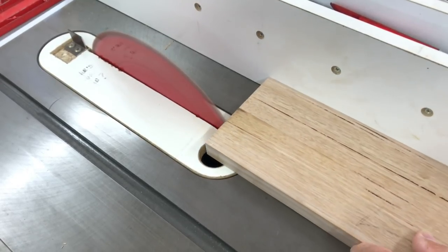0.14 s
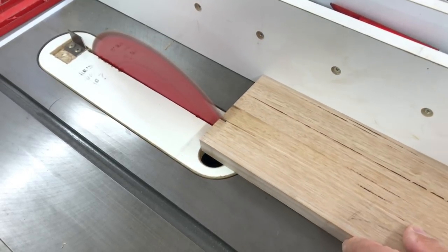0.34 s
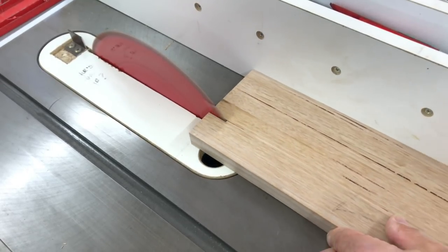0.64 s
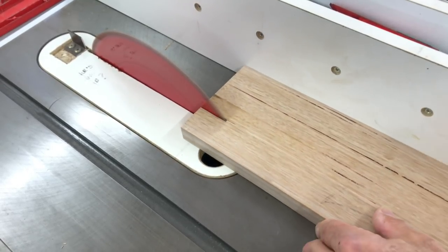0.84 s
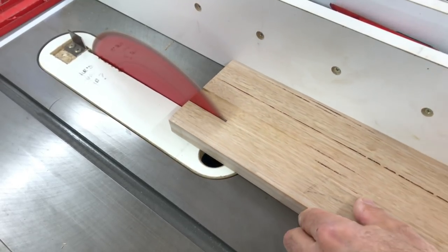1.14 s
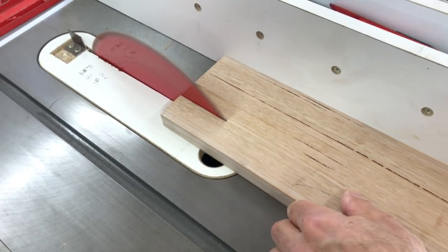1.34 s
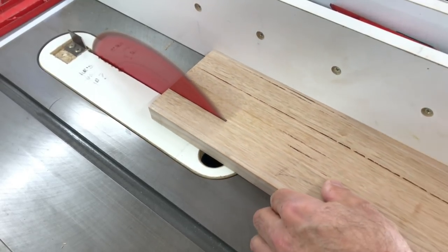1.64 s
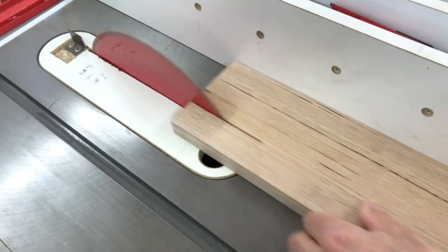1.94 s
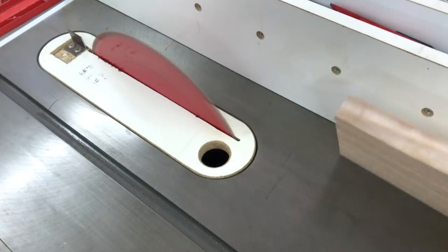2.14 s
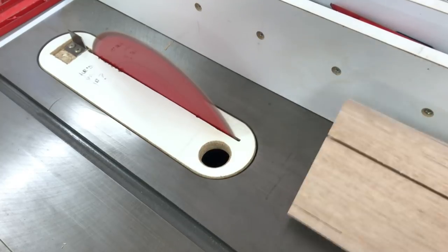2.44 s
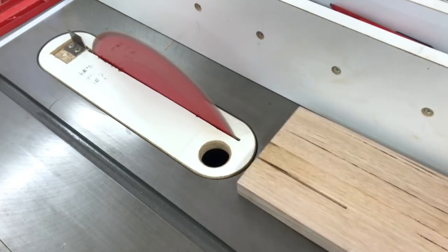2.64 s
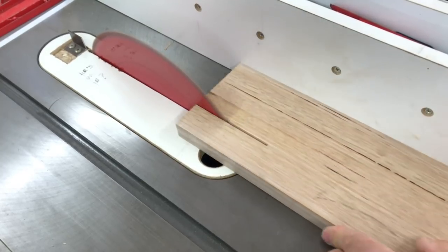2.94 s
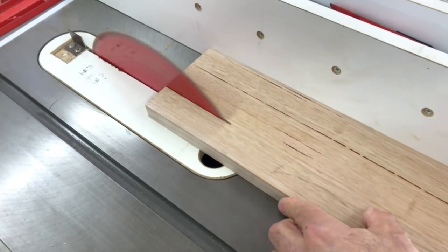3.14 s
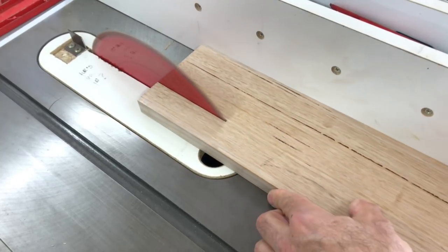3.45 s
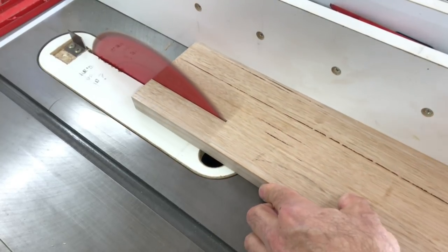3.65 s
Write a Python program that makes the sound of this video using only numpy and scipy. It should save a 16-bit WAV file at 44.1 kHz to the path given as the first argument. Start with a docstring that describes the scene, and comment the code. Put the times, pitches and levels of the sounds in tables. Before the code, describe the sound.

A table saw cuts a hardwood board from the start, its high motor whine sagging slightly and throbbing over blade ringing and airy hiss. At about 2 seconds the cutting stops, the whine lifts a little and the machine's hum and rumble grow louder. The board ticks lightly twice around 2.7 seconds. From about 3 seconds the blade cuts again, continuing until the end near 3.8 seconds.

```python
"""Table saw cutting hardwood

A board is fed into a workshop saw, drawn back and fed in again. The motor whine sags and throbs
under load, and in the cut the teeth excite the blade's resonances. With the board off the throat
opening, the cabinet's rumble and the drone of armature, shaft and hum come through louder.
The blade whips the air into a hiss, and the board's edge ticks twice on the table."""
import sys
import numpy as np
from scipy import signal
from scipy.fft import rfft, irfft
from scipy.io import wavfile
from scipy.ndimage import uniform_filter1d

SR = 44100
rng = np.random.default_rng(int(sys.argv[2]) if len(sys.argv) > 2 else 0)


def wav_out(sig):
    """Save sig, one row per channel (or a flat mono array), as 16-bit PCM at SR to the path in sys.argv[1]."""
    wavfile.write(sys.argv[1], SR, np.round(np.clip(np.atleast_2d(sig).T, -1, 1) * 32767).astype(np.int16))


N = 167580
SLOTS = 12  # armature slots, one whine cycle each
# Cabinet sound escaping through the throat opening: time_s, relative_db
THROAT_LEVEL = [(0.0, -46), (0.02, -44), (0.24, -49), (1.69, -48.5), (2.2, -41), (2.81, -40.5),
                (2.87, -40.5), (2.89, -44), (2.92, -41.5), (3.22, -44), (3.25, -42), (3.52, -46.5),
                (3.64, -45.5), (3.77, -46.5), (3.78, -40), (3.8, -52)]


def from_db(db):
    """Amplitude ratio of a level: tenfold for every 20 dB."""
    return 10 ** (np.asarray(db) / 20)


def rms_one(x):
    """Normalisation to unit power."""
    return x / np.sqrt(np.mean(x ** 2) + 1e-20)


def in_time(rows):
    """Linear interpolation of breakpoints: one curve for each column after time_s."""
    time_s, *columns = np.transpose(rows)
    return [np.interp(np.arange(N) / SR, time_s, column) for column in columns]


def drift(rate_hz):
    """Low-pass filtered noise: a slow random fluctuation of unit spread."""
    step = 40
    pole = np.exp(-2 * np.pi * rate_hz * step / SR)
    white = rng.standard_normal(N // step + 2002)
    slow = signal.lfilter([1], [1, -2 * pole, pole * pole], white)[2000:]
    return np.interp(np.arange(N) / step, np.arange(len(slow)), rms_one(slow - slow.mean()))


def coloured(spectrum, flicker_db, rate_hz, bands):
    """Spectral shaping: noise of unit rms in overlapping bands that flicker independently."""
    log_hz = np.log(np.maximum(np.arange(N // 2 + 1) * SR / N, 1.))
    knot_hz, knot_db = np.transpose(spectrum)
    knots = np.log(knot_hz)
    shaped = rfft(rng.standard_normal(N)) * from_db(np.interp(log_hz, knots, knot_db, -70, -70))
    centres = np.linspace(knots[0], knots[-1], bands)
    layers = (irfft(shaped * np.interp(log_hz, centres, hat), N) for hat in np.eye(bands))
    return rms_one(sum(layer * from_db(flicker_db * drift(rate_hz)) for layer in layers))


def tone(cycles, rms_db, waver_db):
    """A sinusoid under slow random amplitude modulation."""
    return np.sqrt(2) * from_db(rms_db + waver_db * drift(5.2)) * np.sin(2 * np.pi * cycles)


def rotation():
    """Load slows the motor. Speed integrates to phase, in cycles; load runs from 0 to 1."""
    # Slot-passing frequency: time_s, pitch_hz
    slot_rate = [(0, 3154), (.1, 3140), (.2, 3130), (.5, 3116), (.8, 3105), (1.2, 3094), (1.6, 3096),
                 (1.84, 3104), (1.96, 3184), (2.3, 3186), (3.26, 3186), (3.4, 3131), (3.5, 3119),
                 (3.6, 3115), (3.8, 3114)]
    slot_idle_hz, shaft_idle_hz, whistle_idle_hz = 3186, 41.12, 4373
    slot_hz, = in_time(slot_rate)
    sag = 1 - slot_hz / slot_idle_hz
    jitter = 1 + .00015 * drift(25)
    armature = np.cumsum(slot_hz * jitter) / SR / SLOTS + .3
    shaft = np.cumsum(shaft_idle_hz * (1 - .91 * sag)) / SR
    whistle_cycles = np.cumsum(whistle_idle_hz * (1 - .66 * sag)) / SR
    return armature, shaft, whistle_cycles, sag / sag.max()


def reflections(x):
    """Comb filtering: echoes off table, fence and walls ripple the spectrum."""
    # Near reflections: delay_ms, relative_gain
    paths = [(2.3, -.1), (4.1, .12), (7.7, -.12), (13.1, .12)]
    taps = np.zeros(SR // 50)
    taps[0] = 1
    for delay_ms, gain in paths:
        taps[int(delay_ms * SR / 1000)] = gain
    return signal.fftconvolve(x, taps / np.linalg.norm(taps))[:N]


def machine_drone(armature, shaft):
    """Hum, rotation harmonics and their sum tones; most grow louder as the throat opens."""
    # Drone partials: hum_hz, armature_multiple, shaft_multiple, covered_db, open_db
    partials = [(198.25, 0, 0, -64.5, -57), (400.25, 0, 0, -60, -42), (0, 1, 0, -51.5, -46),
                (0, 0, 4, -74, -68), (0, 0, 6, -56.5, -52), (0, 0, 7, -60, -58), (0, 0, 8, -61, -60),
                (0, 0, 10, -74, -55), (0, 0, 11, -67, -55), (0, 0, 12, -66, -59), (0, 0, 14, -64, -63),
                (0, 0, 20, -64, -67), (0, 1, 8, -65, -62), (0, 1, 16, -66, -68), (0, 1, 2, -66, -61),
                (0, 1, 4, -65, -55), (0, 1, 6, -65, -66), (0, 2, 0, -68, -61), (400.25, 0, 1, -67, -59),
                (400.25, 0, 2, -70, -58), (400.25, 0, 4, -68, -55), (400.25, 0, 6, -70, -57),
                (400.25, 0, 10, -70, -60)]
    throat_db, = in_time(THROAT_LEVEL)
    opened = np.interp(uniform_filter1d(throat_db, size=6000), [-48, -42], [0, 1])
    t = np.arange(N) / SR
    drone = 0
    for hum_hz, armature_multiple, shaft_multiple, covered_db, open_db in partials:
        cycles = hum_hz * t + armature_multiple * armature + shaft_multiple * shaft
        offset = rng.random() * (covered_db < -57)  # the two beating partials stay locked to the throb
        drone += tone(cycles + offset, covered_db + (open_db - covered_db) * opened, waver_db=.6)
    return drone


def cabinet_rumble():
    """Radiation through an aperture: cabinet noise is louder with the throat uncovered."""
    # Rumble spectrum: frequency_hz, relative_db
    spectrum = [(100, -44), (145, -36), (190, -26), (225, -25), (260, -15), (300, -23), (340, -7.5),
                (385, -10.5), (430, -8.5), (470, -15), (600, -9.5), (760, -14), (840, -12), (900, -7),
                (1330, -12), (1430, -16.5), (2100, -17.5), (2600, -35)]
    throat_db, = in_time(THROAT_LEVEL)
    return from_db(throat_db - 2) * coloured(spectrum, flicker_db=1.75, rate_hz=60, bands=9)


def air_hiss():
    """Turbulence: air and dust whipped by the blade make broadband noise."""
    # Hiss envelope: time_s, relative_db
    envelope = [(0.0, -40.5), (0.02, -49), (0.05, -44.5), (0.07, -45), (0.26, -47.5), (1.46, -47),
                (1.5, -48.5), (1.97, -46), (2.02, -44), (2.05, -46), (2.07, -45), (2.98, -44),
                (3.58, -46.5), (3.8, -46)]
    # Hiss spectrum: frequency_hz, relative_db
    spectrum = [(900, -56), (1300, -10), (1900, -18.5), (2400, -5.5), (3000, -9.5), (3500, -12.5),
                (4400, -9), (5200, -13), (6000, -13.5), (6700, -11), (8300, -12), (9500, -6), (11300, -5.5),
                (14000, -6), (15800, -4)]
    hiss_db, = in_time(envelope)
    return from_db(hiss_db + 6.5) * coloured(spectrum, flicker_db=.93, rate_hz=10, bands=22)


def board_ticks():
    """Damped impacts: the board's edge on the table gives fast-decaying bursts of band noise."""
    # Edge contacts: start_s, relative_db, low_hz, high_hz
    contacts = [(2.6365, -21, 4300, 6300), (2.746, -25, 900, 2600)]
    t60_s = .014
    ticks, t = np.zeros(N), np.arange(N) / SR
    for start_s, db, low_hz, high_hz in contacts:
        decay = (t > start_s) * from_db(db - 60 * np.maximum(t - start_s, 0) / t60_s)
        band = signal.butter(2, [low_hz, high_hz], "band", fs=SR, output="sos")
        ticks += 2 * signal.sosfilt(band, decay * rng.choice([-1, 1], N))
    return ticks


def whistle(cycles):
    """An inharmonic partial: a thin tone outside the whine's harmonic series."""
    # Whistle envelope: time_s, level_db
    envelope = [(0, -54), (1, -57.5), (1.8, -50.5), (2, -52), (2.7, -48.5), (3.3, -50.5), (3.8, -61)]
    level_db, = in_time(envelope)
    return tone(cycles, level_db, waver_db=1.25)


def motor_whine(armature, throb):
    """Periodic excitation: passing armature slots give five harmonics, modulated by the throb."""
    # Whine harmonics: time_s, then level_db of harmonics 1 to 5
    harmonics = [(0, -48, -43.5, -48, -46, -57), (.14, -42.5, -43.5, -48, -50, -51),
                 (.37, -44.5, -48.5, -53, -44, -56), (.6, -43.5, -46.5, -55, -45, -61),
                 (.86, -43.5, -44, -66, -52, -51), (1.1, -41, -40, -58, -46, -46),
                 (1.3, -41, -42, -60, -52, -46), (1.55, -42, -42.5, -69, -63, -48),
                 (1.86, -42, -45, -57, -57, -53), (1.96, -43.5, -50.5, -49, -58, -70),
                 (2.08, -43.5, -43.5, -60, -56, -70), (2.3, -41.5, -43, -55, -46, -70),
                 (2.7, -42.5, -42.5, -65, -48, -70), (2.83, -41.5, -44.5, -53, -41, -70),
                 (2.88, -41, -44.5, -40, -50, -70), (3.1, -43, -50, -47, -56, -70),
                 (3.3, -42, -45.5, -50, -66, -58), (3.44, -41.5, -43, -65, -62, -56),
                 (3.8, -43, -43, -58, -60, -57)]
    # Modulation of the second harmonic: time_s, throb_factor
    octave_throb = [(0, 1.1), (1.9, 1.1), (3.3, 3.6), (3.8, 3.8)]
    octave_factor, = in_time(octave_throb)
    whine = 0
    for k, level_db in enumerate(in_time(harmonics), 1):
        partial = tone(k * SLOTS * armature + rng.random(), level_db, waver_db=.06 if k < 3 else 2.5)
        whine += partial * (1 + (octave_factor if k == 2 else .73) * throb)
    return whine


def blade_singing():
    """Resonance: one blade mode sings in the cut as a nearly pure tone."""
    # Singing mode: time_s, pitch_hz, level_db
    mode = [(0, 3630, -60), (.07, 3633, -49), (.2, 3624, -55), (.4, 3619, -54), (1.2, 3616, -56),
            (1.85, 3620, -52), (2.0, 3632, -66), (2.1, 3632, -75), (2.85, 3632, -75), (3.0, 3632, -59),
            (3.4, 3632, -56), (3.8, 3634, -55)]
    pitch_hz, level_db = in_time(mode)
    return tone(np.cumsum(pitch_hz + 4 * drift(15)) / SR, level_db, waver_db=2.2)


def blade_cutting(armature, load):
    """Forced vibration: chips torn at random ring the blade's modes, over a comb of armature tones."""
    # Strength of the cut: time_s, relative_db
    envelope = [(0.0, -48), (0.07, -47.5), (0.16, -48.5), (1.69, -46), (1.7, -47), (1.82, -45), (2.07, -61),
                (2.84, -72), (2.96, -50.5), (3.31, -47), (3.34, -44.5), (3.57, -44.5), (3.59, -43.5),
                (3.8, -46.5)]
    # Blade modes: centre_hz
    mode_hz = [1150, 2080, 2435, 2778, 3100, 3625, 3825, 4405, 5170, 5930, 6210, 6835, 7470, 7900, 8500,
               9020, 9300, 9600, 10580, 11850, 12790, 13200, 13700, 15200]
    # Resonance peak of each mode: bandwidth_hz, relative_db
    mode_peaks = [(415, -22), (198, -13.5), (70, -12.5), (35, -12), (41.7, -6), (30, -7), (50, -7),
                  (25.2, -5.5), (30, -14), (50, -15), (60, -7.5), (40, -6.5), (45.3, -7.5), (60, -14.5),
                  (21.8, -4), (45, -3.5), (80.5, -20.5), (60, -9.5), (90, -21.5), (40.2, -6.5), (50, -14),
                  (60, -19), (45, -22), (40, -15)]
    # Comb tones: armature_multiple
    comb_orders = [10, 13, 14, 15, 17, 20, 23, 24.62, 25, 29, 31, 32, 33, 34, 35, 36, 46]
    # Strength of each comb tone: relative_db
    comb_levels = [-18, -6, -5.5, -8.5, -2.5, -14, -18, -6, -2, -6, -12, -9, -11, -17, -7, -18, -22]
    ringing = comb = 0
    for centre_hz, (bandwidth_hz, db) in zip(mode_hz, mode_peaks):
        radius = np.exp(-np.pi * bandwidth_hz / SR)
        b = (1 - radius ** 2) / 2 * np.array([1, 0, -1])
        a = [1, -2 * radius * np.cos(2 * np.pi * centre_hz / SR), radius ** 2]
        gain = from_db(db + 1.3 * drift(2.9))
        ringing += gain * signal.lfilter(b, a, rng.standard_normal(N + 8000))[8000:]
    load_db = 6 * load - 10.5  # the comb grows with the load
    for order, db in zip(comb_orders, comb_levels):
        comb += tone(order * armature + rng.random(), db + load_db, waver_db=.68)
    cut_db, = in_time(envelope)
    return from_db(cut_db) * (from_db(4.5) * rms_one(ringing) + comb)


def scene():
    """Superposition; under load the armature beats with the sixth shaft harmonic, making a throb."""
    armature, shaft, whistle_cycles, load = rotation()
    throb_depth, lag_cycles = .1, .18
    throb = throb_depth * load * np.cos(2 * np.pi * (armature - 6 * shaft - lag_cycles))
    drone = machine_drone(armature, shaft)
    noise = reflections((1 + 2.8 * throb) * cabinet_rumble() + (1 + .64 * throb) * air_hiss())
    tones = motor_whine(armature, throb) + blade_singing() + whistle(whistle_cycles)
    cutting = (1 + .98 * throb) * blade_cutting(armature, load)
    return np.tile(drone + noise + board_ticks() + tones + cutting, (2, 1))


def record(dry):
    """Band limiting: a steep elliptic low-pass removes the highest treble."""
    cutoff_hz = 15720
    return signal.sosfilt(signal.ellip(14, .3, 75, cutoff_hz, fs=SR, output="sos"), dry)


dry = scene()
out = record(dry)
wav_out(out)
```